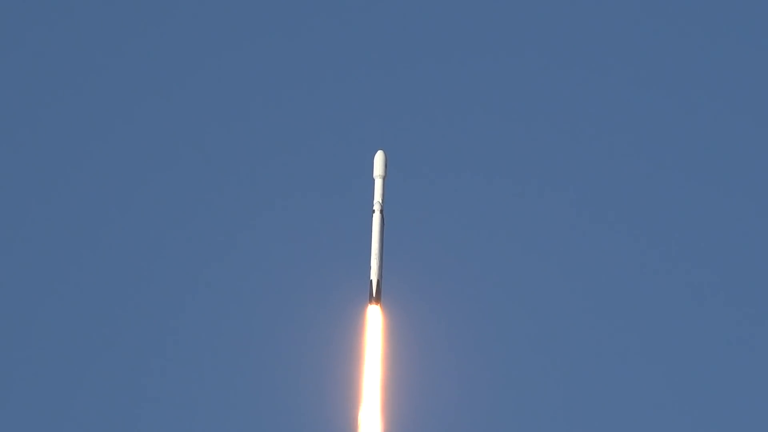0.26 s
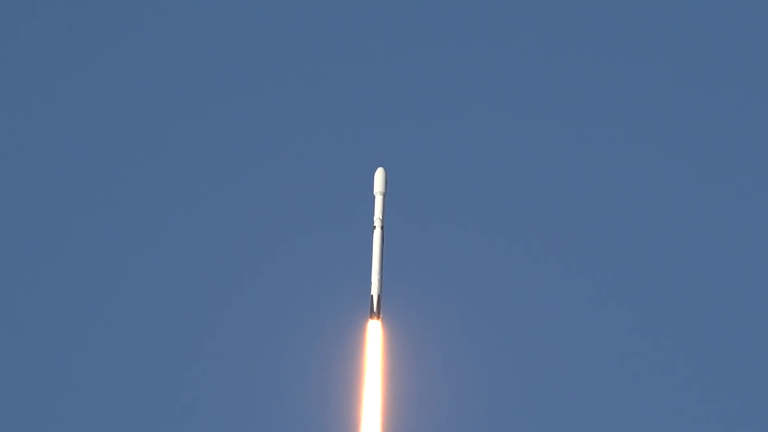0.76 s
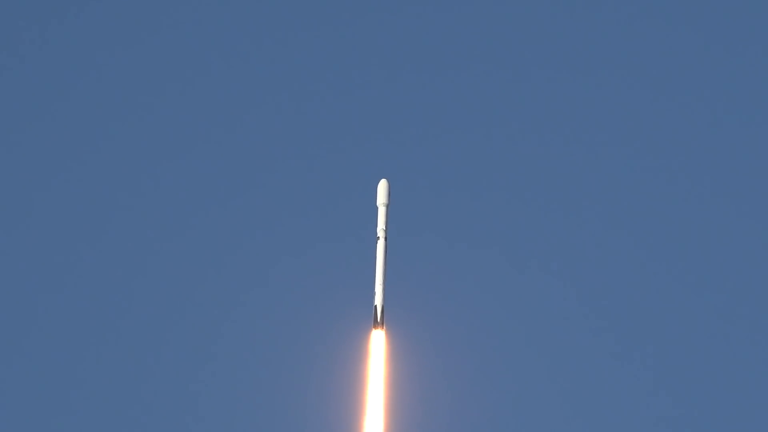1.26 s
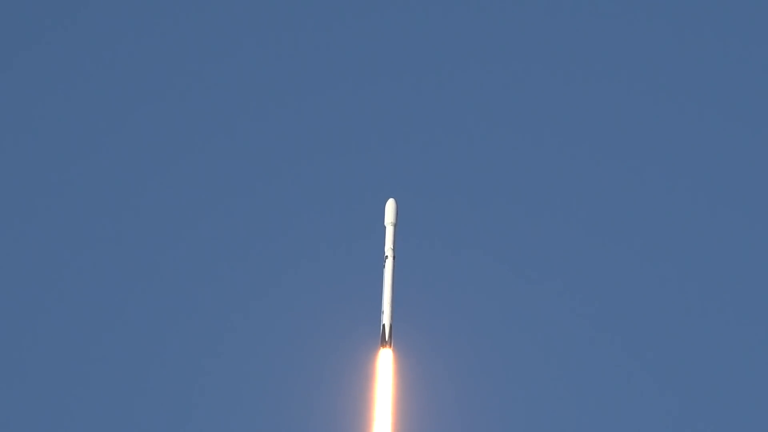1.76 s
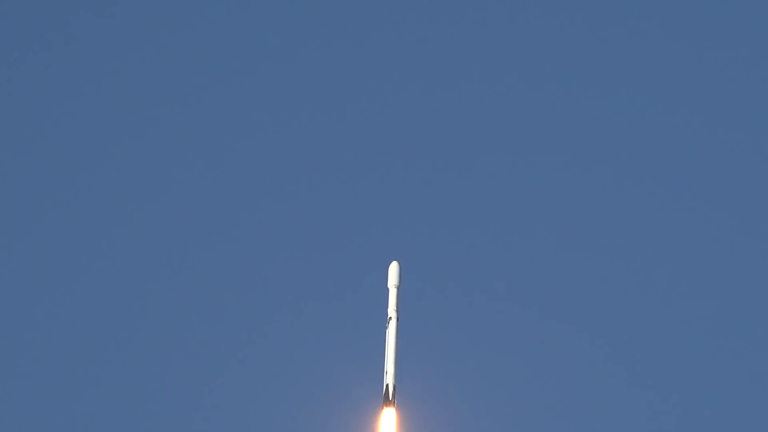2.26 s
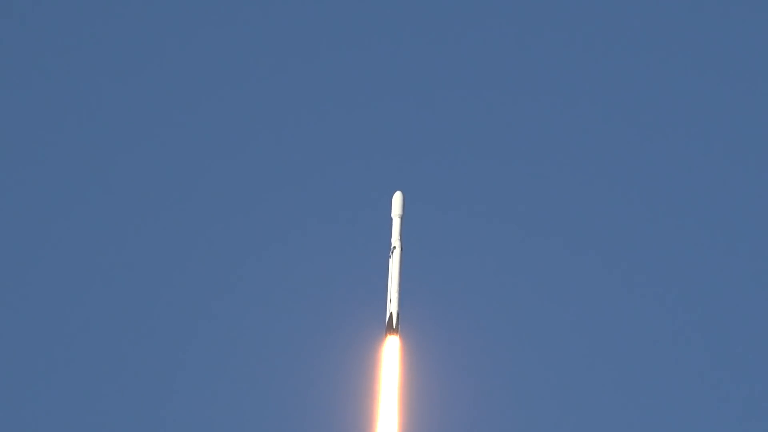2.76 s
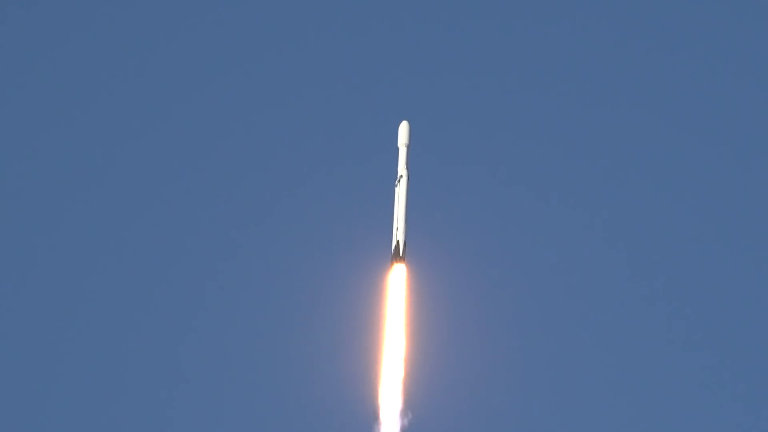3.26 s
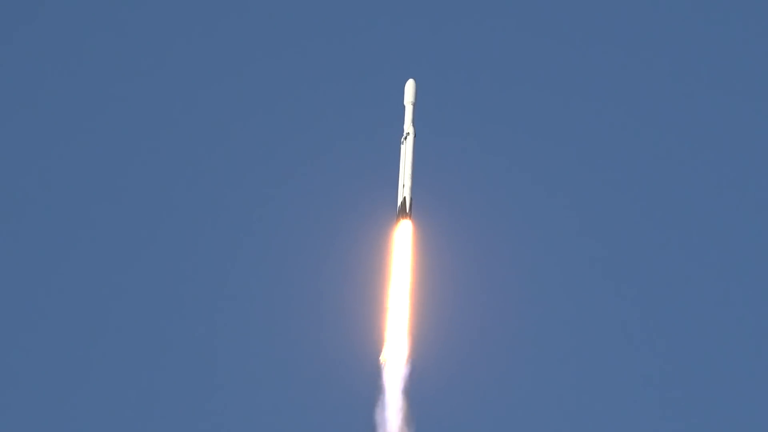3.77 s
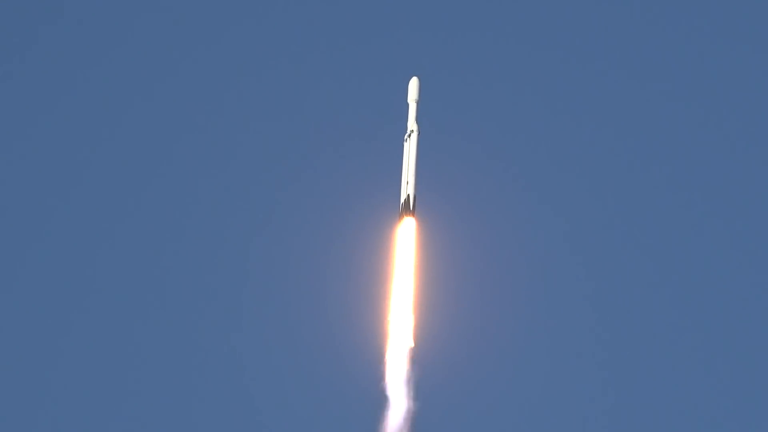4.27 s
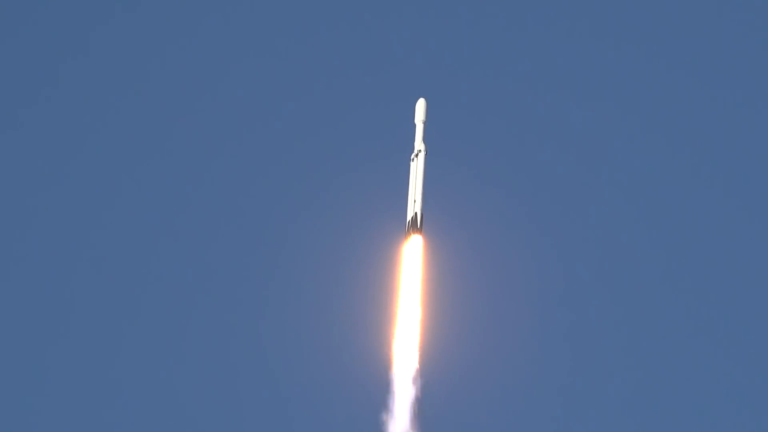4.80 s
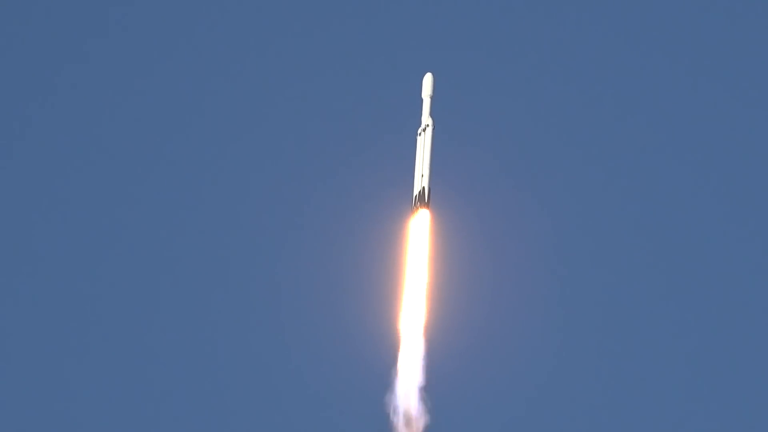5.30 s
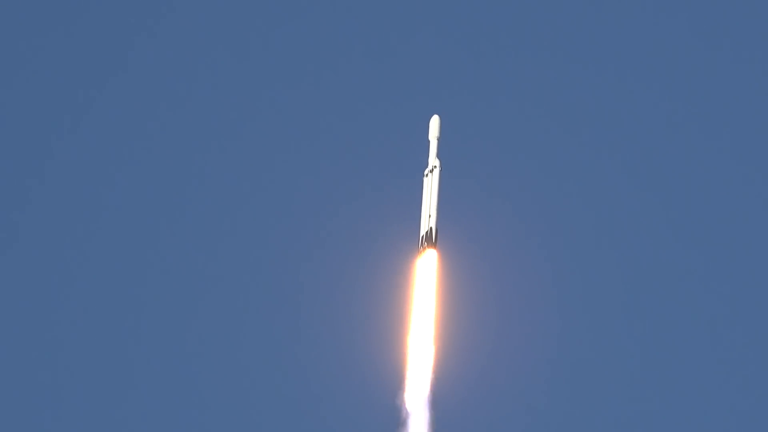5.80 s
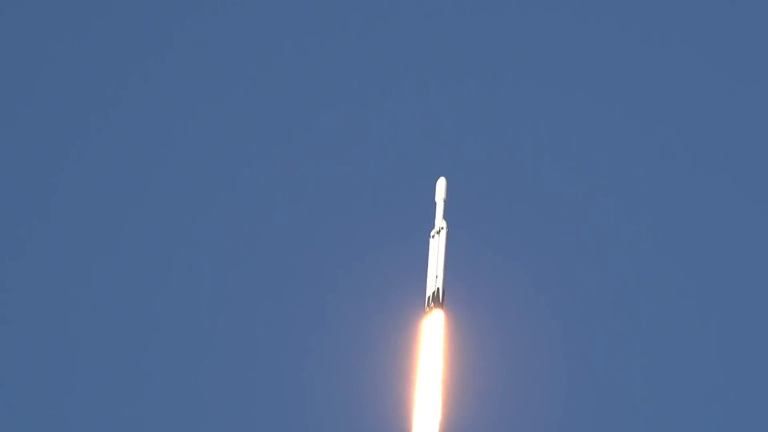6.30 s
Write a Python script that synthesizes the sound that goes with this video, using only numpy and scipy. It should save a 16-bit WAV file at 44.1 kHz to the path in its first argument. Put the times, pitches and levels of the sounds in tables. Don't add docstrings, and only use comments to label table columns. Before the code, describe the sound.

Open ground far below a climbing rocket, heard for about six and a half seconds. The roar is already present at 0 s: deep, dense, continuous and restless, with heavy bass thuds in the first third of a second. Until about 2.3 s the crackle stays dull and fairly weak, buried in the rumble; very faint dry ticks from the microphone mount fall near 0.5 s. From 2.4 s steeper pops appear, growing firm by 3.3 to 3.6 s. Around 3.9 s they turn bright and snapping. Strong cracks cluster near 4.75 s and the largest bursts at about 5.2 s, with a punchy low push. Dense ripping crackle continues to the end as the roar sinks slightly in pitch. Small ticks near 6.2 s are almost hidden. Short reflections from ground and nearby hard surfaces roughen and widen each crack; there is no fade-out.

```python
import sys
import numpy as np
from scipy import signal
from scipy.io import wavfile
from scipy.ndimage import uniform_filter1d, minimum_filter1d

SR = 44100
rng = np.random.default_rng(int(sys.argv[2]) if len(sys.argv) > 2 else 0)


def magnitude_from_level(level_db):
    exponent = np.asarray(level_db, float) / 20
    return 10 ** exponent


def store_pcm(level_fs):
    pcm = np.round(np.clip(level_fs, -1, 1) * 32767).astype(np.int16)
    wavfile.write(sys.argv[1], SR, np.atleast_2d(pcm).T)


N = 288716
TOP_HZ = 20000
BRIGHT_DB = -15

# start_s, loudness_db, harshness_db
EXHAUST = [(0.0, -15.5, -49.5), (0.14, -13, -68), (0.22, -17, -55), (0.25, -7.5, -61), (0.31, -12.5, -53),
           (0.67, -10.5, -56), (0.75, -15.5, -56), (1.04, -11, -57), (1.06, -16, -56), (1.31, -13, -56),
           (2.01, -13.5, -52), (3.96, -15, -52.5), (4.54, -15, -51.5), (5.38, -14, -50.5),
           (6.11, -14, -51.5), (6.2, -17.5, -52), (6.29, -11, -57), (6.55, -14.5, -52.5)]


def crackle():
    rise_at_bright_ms, rise_ms_per_db, weak_rise_ms_per_db = .036, .003, .0014
    push_lead_s = .001
    s, front_db, bright_db, push_db = fronts()
    push, swing = pushes(s - push_lead_s, push_db)
    rise_ms = rise_at_bright_ms - rise_ms_per_db * (bright_db - BRIGHT_DB)
    rise_ms = np.clip(rise_ms - weak_rise_ms_per_db * (front_db + 27), .008, .12)
    step_db = front_db + 6 + 90 * rise_ms
    edge = rounded(s, magnitude_from_level(step_db), rise_ms)
    return push, swing, sharp_part(edge + trail(s, step_db, rise_ms))


def trail(s, step_db, rise_ms):
    late_s = rng.random((len(s), 30)) ** 1.5 * .04
    turbulence_db = -9 - 0.1 * s
    fade_db_per_s = 320 + 115 * s
    size_db = (step_db + turbulence_db)[:, None] - fade_db_per_s[:, None] * late_s
    size = magnitude_from_level(size_db) * rng.standard_normal(late_s.shape)
    first_rise_ms = (.85 + .02 * s) * rise_ms
    ripple_rise_ms = first_rise_ms[:, None] * (1 + 29 * late_s)
    return rounded((s[:, None] + late_s).ravel(), size.ravel(), ripple_rise_ms.ravel())


def fronts():
    # start_s, peak_db, brightness_db, push_db
    steep_fronts = [(0.0649, -35.0, -23.0, -9.0), (0.1087, -31.0, -27.0, -2.0), (0.1458, -29.0, -21.0, -8.0),
                    (0.184, -44.0, -27.0, -16.0), (0.245, -26.0, -26.0, -1.0), (0.3264, -45.0, -30.0, -19.0),
                    (0.3415, -43.0, -32.0, -11.0), (0.4694, -42.0, -9.0, -15.0), (0.5701, -40.0, -16.0, -19.0),
                    (0.6365, -37.0, -23.0, -5.0), (0.7335, -45.0, -27.0, -25.0), (0.8363, -42.0, -21.0, -30.0),
                    (0.8558, -39.0, -27.0, -20.0), (0.9056, -44.0, -31.0, -13.0),
                    (0.9277, -42.0, -33.0, -30.0), (1.0316, -42.0, -24.0, -30.0), (1.1095, -40.0, -31.0, -7.0),
                    (1.2404, -45.0, -39.0, -15.0), (1.333, -40.0, -34.0, -20.0), (1.386, -38.0, -26.0, -8.0),
                    (1.4269, -43.0, -30.0, -30.0), (1.5054, -41.0, -33.0, -30.0),
                    (1.6371, -39.0, -30.0, -30.0), (1.6603, -39.0, -38.0, -6.0), (1.697, -45.0, -34.0, -9.0),
                    (1.7351, -45.0, -32.0, -13.0), (1.809, -43.0, -31.0, -12.0), (1.8358, -41.0, -33.0, -11.0),
                    (1.851, -45.0, -27.0, -17.0), (1.8668, -43.0, -38.0, -6.0), (1.8978, -41.0, -22.0, -12.0),
                    (1.9274, -41.0, -29.0, -24.0), (1.9576, -41.0, -32.0, -30.0),
                    (1.9823, -38.0, -30.0, -12.0), (2.0127, -39.0, -38.0, -11.0),
                    (2.0802, -43.0, -33.0, -17.0), (2.1408, -38.0, -25.0, -1.0), (2.1851, -39.0, -29.0, -28.0),
                    (2.203, -39.0, -27.0, -30.0), (2.2679, -40.0, -25.0, -30.0), (2.289, -42.0, -31.0, -15.0),
                    (2.3373, -34.0, -24.0, -7.0),
                    (2.3776, -43.0, -32.0, -18.0), (2.4006, -41.0, -32.0, -11.0),
                    (2.4105, -38.0, -32.0, -8.0), (2.4601, -40.0, -25.0, -8.0),
                    (2.5205, -38.0, -33.0, -13.0), (2.5513, -37.0, -27.0, -30.0),
                    (2.5914, -36.0, -19.0, -6.0), (2.6209, -37.0, -33.0, -11.0),
                    (2.6938, -37.0, -32.0, -18.0), (2.71, -38.0, -22.0, -19.0),
                    (2.732, -40.0, -27.0, -11.0), (2.785, -39.0, -33.0, -5.0), (2.8052, -31.0, -18.0, -5.0),
                    (2.8677, -35.0, -21.0, -15.0), (2.9028, -34.0, -24.0, -4.0),
                    (2.928, -35.0, -26.0, -30.0), (2.9546, -38.0, -25.0, -9.0),
                    (2.9753, -32.0, -30.0, -6.0), (3.1296, -33.0, -23.0, -12.0),
                    (3.1811, -38.0, -30.0, -10.0), (3.1947, -41.0, -33.0, -13.0),
                    (3.22, -31.0, -20.0, -5.0), (3.265, -37.0, -31.0, -11.0), (3.2995, -40.0, -33.0, -9.0),
                    (3.3161, -40.0, -30.0, -11.0), (3.3421, -25.0, -23.0, -4.0),
                    (3.3765, -30.0, -18.0, -9.0), (3.4119, -35.0, -14.0, -8.0),
                    (3.4396, -30.0, -21.0, -8.0), (3.4749, -30.0, -19.0, -6.0),
                    (3.5195, -29.0, -17.0, -6.0), (3.5576, -39.0, -27.0, -7.0),
                    (3.5746, -24.0, -19.0, -6.0), (3.6187, -37.0, -29.0, -7.0),
                    (3.6287, -35.0, -31.0, -10.0), (3.6904, -40.0, -18.0, -22.0),
                    (3.7092, -38.0, -25.0, -5.0), (3.7251, -36.0, -27.0, -8.0),
                    (3.7613, -35.0, -34.0, -10.0), (3.7803, -41.0, -21.0, -15.0),
                    (3.8101, -28.0, -29.0, -4.0), (3.8455, -41.0, -20.0, -15.0),
                    (3.8685, -23.0, -10.0, -5.0), (3.8915, -24.0, -13.0, -5.0), (3.9141, -38.0, -27.0, -11.0),
               (3.9677, -33.0, -23.0, -9.0), (3.9883, -39.0, -17.0, -12.0), (4.0057, -36.0, -29.0, -11.0),
               (4.049, -38.0, -23.0, -20.0), (4.0675, -36.0, -20.0, -7.0), (4.1056, -42.0, -21.0, -12.0),
               (4.1212, -33.0, -21.0, -14.0), (4.1484, -32.0, -16.0, -7.0), (4.1782, -42.0, -16.0, -12.0),
               (4.2135, -28.0, -14.0, -5.0), (4.2347, -42.0, -24.0, -21.0), (4.26, -36.0, -20.0, -9.0),
               (4.2955, -35.0, -16.0, -5.0), (4.3198, -32.0, -15.0, -9.0), (4.3598, -42.0, -26.0, -30.0),
               (4.4085, -28.0, -14.0, -2.0), (4.4406, -42.0, -23.0, -10.0), (4.5109, -28.0, -11.0, -4.0),
               (4.5571, -34.0, -23.0, -10.0), (4.603, -31.0, -13.0, -4.0), (4.6204, -32.0, -28.0, -6.0),
               (4.6954, -37.0, -23.0, -30.0), (4.7298, -35.0, -15.0, -4.0), (4.7528, -20.0, -13.0, 0.0),
               (4.7788, -21.0, -17.0, -1.0), (4.799, -32.0, -27.0, -8.0), (4.8107, -30.0, -19.0, -4.0),
               (4.8505, -36.0, -22.0, -2.0), (4.8902, -29.0, -23.0, -5.0), (4.9209, -31.0, -15.0, -3.0),
               (4.9557, -37.0, -19.0, -11.0), (4.9716, -35.0, -28.0, -4.0), (4.9873, -33.0, -27.0, -3.0),
               (5.0087, -42.0, -26.0, -12.0), (5.0312, -41.0, -25.0, -7.0), (5.063, -38.0, -24.0, -30.0),
               (5.0992, -22.0, -18.0, -2.0), (5.1536, -40.0, -15.0, -5.0), (5.1689, -13.0, -13.0, 2.0),
                    (5.2, -29.0, -19.0, -1.0), (5.2288, -26.0, -23.0, -6.0), (5.2618, -32.0, -22.0, -6.0),
                  (5.2821, -37.0, -25.0, -8.0), (5.331, -39.0, -24.0, -9.0), (5.3507, -25.0, -17.0, -2.0),
                  (5.3841, -25.0, -15.0, -2.0), (5.4106, -32.0, -13.0, -8.0), (5.439, -33.0, -25.0, -6.0),
                  (5.4564, -24.0, -20.0, -4.0), (5.4838, -25.0, -19.0, -4.0), (5.5161, -41.0, -21.0, -30.0),
                  (5.5493, -21.0, -18.0, -1.0), (5.567, -31.0, -21.0, -1.0), (5.6171, -35.0, -28.0, -9.0),
                  (5.6379, -34.0, -12.0, -6.0), (5.6904, -36.0, -22.0, -9.0), (5.7249, -32.0, -17.0, -8.0),
                  (5.801, -32.0, -22.0, -6.0), (5.845, -35.0, -23.0, -5.0), (5.8705, -39.0, -25.0, -30.0),
                  (5.9107, -32.0, -12.0, -2.0), (5.9391, -41.0, -24.0, -9.0), (5.9693, -36.0, -18.0, -1.0),
                  (5.9926, -35.0, -21.0, -4.0), (6.0224, -33.0, -8.0, -2.0), (6.0566, -42.0, -24.0, -20.0),
                  (6.1008, -35.0, -14.0, -3.0), (6.1314, -36.0, -19.0, -9.0), (6.149, -37.0, -17.0, -5.0),
                  (6.2248, -39.0, -21.0, -5.0), (6.2397, -36, -10, -10), (6.2701, -34.0, -11.0, -5.0),
                  (6.3144, -33.0, -11.0, -6.0), (6.355, -31.0, -10.0, -1.0), (6.3939, -41.0, -18.0, -7.0),
                  (6.4359, -35.0, -16.0, -7.0), (6.4667, -38.0, -22.0, -9.0), (6.5075, -36.0, -24.0, -5.0)]
    weak_count, weak_over_harsh_db, weak_spread_db = 20, 6, 3.5
    late_s, front_gain_db = .0001, -2.5
    push_gain_db, push_spread, mean_push_db = -0.4, 1.15, 0.1
    chance = rng.random((weak_count, 3))
    at = (chance[:, 0] * (N - SR // 10)).astype(int)
    harsh_db = in_time(EXHAUST)[1][at]
    weak_db = harsh_db + weak_over_harsh_db - weak_spread_db * np.log(1 - .9 * chance[:, 1])
    weak = np.transpose([at / SR, weak_db, BRIGHT_DB - 6 - 6 * chance[:, 2], weak_db + 25])
    s, peak_db, bright_db, push_db = np.vstack([steep_fronts, weak]).T
    bright_db = np.minimum(bright_db, -25.5 + 4.2 * s)
    push_db = push_gain_db + push_spread * (push_db - mean_push_db)
    return s + late_s, peak_db + front_gain_db, bright_db, push_db


def pushes(s, push_db):
    spike_ms, swing_db, swing_cycles = 1.1, -6.5, 1.2
    lead_samples = 27
    k = np.arange(SR // 12)
    ms = k * 1000 / SR
    cycle_ms = (12 + 2.8 * s)[:, None]
    at = (s * SR).astype(int)[:, None] + k
    size = magnitude_from_level(np.minimum(push_db, 0))[:, None]
    spike, swing = np.zeros((2, N + SR // 5))
    np.add.at(spike, at, size * np.exp(-ms / spike_ms))
    wave = np.cos(2 * np.pi * ms / cycle_ms) * np.exp(-ms / cycle_ms / swing_cycles)
    np.add.at(swing, at, size * magnitude_from_level(swing_db) * wave)
    round_part = dull(spike[lead_samples:N + lead_samples], 350, order=3)
    snap = magnitude_from_level(climbed(-24, -2.5)) * (dull(spike[:N], 720, order=3) - round_part)
    return round_part + snap, dull(swing[:N], 260, order=3)


def roar():
    lumps_db, lumps_per_s = 2, 9
    mean_harsh_db = -53
    t = np.arange(N) / SR
    loud_db, harsh_db = in_time(EXHAUST)
    harsh_db = harsh_db - mean_harsh_db
    deep_db = loud_db - 4.5 + 0.65 * t + lumps_db * drift(lumps_per_s)
    low_db = loud_db + 1.5 - 1.75 * t + lumps_db * drift(lumps_per_s)
    middle_db = loud_db - 10.3 + 0.33 * t + 0.97 * harsh_db + lumps_db * drift(lumps_per_s)
    rattle_db = -43.5 + 0.69 * harsh_db
    clumps = magnitude_from_level(3.0 * drift(14))
    born = rng.random(N) < 400 * clumps / SR
    strength = np.minimum(rng.exponential(1, N), 4)
    small_fronts = rms_one(born * magnitude_from_level(3.3 * strength))
    noise = rng.standard_normal((2, N))
    mixed = jump(small_fronts + 0.6 * noise[0], swing_hz=36.3, decay_ms=4.9)
    deep = rms_one(band(0.46 * small_fronts + noise[1], 26, 69.6))
    low = rms_one(band(mixed, 79, 162.5))
    middle = rms_one(band(mixed, 130, 407))
    ripple = rng.random(N) < 3000 * clumps / SR
    at = np.flatnonzero(born | ripple)
    size = np.where(born[at], magnitude_from_level(2.2 * strength[at]), 0.55 * noise[1, at])
    rise_ms = (0.142 - .0115 * t[at]) * magnitude_from_level(-1.2 * strength[at])
    rattle = rms_one(sharp_part(rounded(at / SR, size, rise_ms)))
    body = magnitude_from_level(deep_db - 1.2) * deep + magnitude_from_level(low_db - 3) * low + magnitude_from_level(middle_db - 3) * middle
    return body, magnitude_from_level(rattle_db - 8.5) * rattle


def rounded(times, sizes, rise_ms):
    k = np.arange(-40, 41)
    width = np.clip(rise_ms, .008, .25)[:, None] * SR / 1000
    slope = 1 / np.cosh(k / width) ** 2
    out = np.zeros(N + SR // 10)
    at = (times * SR).astype(int)[:, None] + k
    np.add.at(out, at, sizes[:, None] * slope / slope.sum(axis=1, keepdims=True))
    return out[:N]


def jump(x, swing_hz, decay_ms):
    r = np.exp(-1000 / (decay_ms * SR))
    c = np.cos(2 * np.pi * swing_hz / SR)
    return signal.lfilter([1, -r * c], [1, -2 * r * c, r * r], x + 1e-18)


def sharp_part(slope):
    return band(jump(slope, swing_hz=40, decay_ms=1.8), 540, 9800, order=1)


def climbed(low_db, high_db):
    full_at_s, full_over_s = 4.6, 0.35
    return low_db + (high_db - low_db) / (1 + np.exp((full_at_s - np.arange(N) / SR) / full_over_s))


def ground(x, gain_db, cut_hz):
    lag_ms = 1.2 + .6 * np.arange(N) / SR
    return magnitude_from_level(climbed(-3, 1.5) + gain_db) * dull(delayed(x, lag_ms), cut_hz, order=1)


def wall(x):
    lag_ms = 20 - 1.3 * np.arange(N) / SR
    return magnitude_from_level(climbed(-5, -16)) * band(delayed(x, lag_ms), 70, 400, order=1)


def nearby(x, taps):
    waver = 1 + 0.018 * drift(5)
    bright = x + 0.41 * band(x, 4500, TOP_HZ, order=1)
    return x + sum(gain * delayed(bright, ms * waver) for ms, gain in taps)


def small_panel(x):
    gain_db = -5 + np.array([[3], [-3]])
    return magnitude_from_level(gain_db) * delayed(band(x, 2400, 13000), 6.95)


def landscape(x, t60, onset_ms, alike):
    t = np.arange(SR // 4) / SR
    tail = rng.standard_normal((2, 2, len(t))) * magnitude_from_level(-60 * t / t60) * (1 - np.exp(-t * 1000 / onset_ms))
    tail /= np.sqrt(np.sum(tail ** 2, axis=2, keepdims=True))
    alike = np.clip(alike, 0, 1)
    tail[:, 1] = alike * tail[:, 0] + np.sqrt(1 - alike ** 2) * tail[:, 1]
    turn = 2.35 * drift(12)
    shares = np.cos(turn), np.sin(turn)
    return sum(signal.oaconvolve((x * share)[None], path, axes=1)[:, :N] for share, path in zip(shares, tail))


def near_ticks():
    # start_s, peak_db
    ticks = [
        (0.4723, -48),
        (0.4776, -60),
        (0.5742, -52.5),
        (0.577, -64),
        (6.192, -58),
        (6.204, -60),
    ]
    s, peak_db = np.transpose(ticks)
    return band(clicks(s, magnitude_from_level(peak_db + 14.5)), 5500, 10500)


def band(x, low_hz, high_hz, order=2):
    sos = signal.butter(order, [low_hz, min(high_hz, TOP_HZ)], "band", fs=SR, output="sos")
    return signal.sosfilt(sos, x + 1e-18)


def dull(x, cut_hz, order=2):
    return signal.sosfilt(signal.butter(order, cut_hz, fs=SR, output="sos"), x + 1e-18)


def peak(x, hz, width_hz, gain_db):
    w, a = 2 * np.pi * hz / SR, magnitude_from_level(gain_db / 2)
    q = np.sin(w) * width_hz / hz / 2
    return signal.lfilter([1 + q * a, -2 * np.cos(w), 1 - q * a], [1 + q / a, -2 * np.cos(w), 1 - q / a], x)


def delayed(x, lag_ms):
    return np.interp(np.arange(N) - lag_ms * SR / 1000, np.arange(N), x)


def later(x):
    return np.append(x[0], x[:-1])


def rms_one(x):
    return x / np.sqrt(np.mean(x ** 2) + 1e-20)


def in_time(rows):
    s, *columns = np.transpose(rows)
    return [np.interp(np.arange(N) / SR, s, c) for c in columns]


def drift(rate):
    knots = rng.standard_normal(int(N / SR * 40) + 2)
    return np.interp(np.arange(N) / SR * min(rate, 39), np.arange(len(knots)), knots)


def clicks(times, sizes):
    out = np.zeros(N)
    out[(np.asarray(times) * SR).astype(int)] = sizes
    return out


def limiter(x, hold_ms):
    size = int(hold_ms * SR / 1000)
    room = np.minimum(1, 1 / (np.abs(x).max(axis=0) + 1e-9))
    return x * uniform_filter1d(minimum_filter1d(room, size=2 * size + 1), size=size)


def scene():
    # lag_ms, gain (linear)
    near_left = [(.42, 0.0061), (1.15, -0.066), (2.85, -0.25), (3.25, 0.25), (3.56, 0.12), (5.8, -0.078),
                 (6.8, 0.3), (7.18, -0.18), (7.6, 0.003)]
    near_right = [(.43, 0.07), (1.2, -0.19), (2.7, 0.061), (4.1, 0.1), (4.4, -0.25), (5.8, 0.19),
                  (6.92, 0.38), (7.14, 0.23), (7.56, 0.29)]
    body, rattle = roar()
    push, swing, edge = crackle()
    soft = body + push + swing + ground(push, gain_db=-4, cut_hz=500) + wall(push + swing)
    soft = dull(soft, 2500, order=3)
    sharp = rattle + edge
    sharp = sharp + magnitude_from_level(climbed(-13, 2.5)) * band(sharp, 260, 950, order=1)
    sharp = sharp + ground(sharp, gain_db=4.5, cut_hz=150)
    near = np.array([nearby(sharp, near_left), nearby(later(sharp), near_right)])
    near = near + small_panel(sharp)
    clutter = magnitude_from_level(-2.5) * landscape(band(sharp, 2600, 9500), t60=0.047, onset_ms=0.97, alike=.1)
    rumble_back = magnitude_from_level(-11.5) * landscape(band(soft, 30, 120), t60=0.23, onset_ms=1.5, alike=.1)
    rattle_back = magnitude_from_level(-10) * landscape(dull(sharp, 4000), t60=.3, onset_ms=6, alike=.92)
    return np.array([soft, later(soft)]) + near + clutter + rumble_back + rattle_back + near_ticks()


def roll_off(x):
    return signal.sosfilt(signal.butter(12, 16900, fs=SR, output="sos"), x)


def record(dry):
    # center_hz, width_hz, left_db, right_db
    housing = [(190, 149, 4.5, 3.5), (343, 170, 1.5, 3), (539, 58.4, -12.5, -12.5), (588, 280, 5.5, 0.5),
               (707, 21, -16.5, -3), (980, 40, 2, -5.5), (1870, 2000, 4, 2.5), (4400, 1500, 3, -4),
               (10600, 8000, 6, 1)]
    floor_db = -94.5
    for hz, width_hz, left_db, right_db in housing:
        dry = np.array([peak(dry[0], hz, width_hz, left_db), peak(dry[1], hz, width_hz, right_db)])
    dry = limiter(band(dry, 3.7, 23000, order=1), hold_ms=14)
    dry = dry + magnitude_from_level(floor_db) * dull(rng.standard_normal(dry.shape), 12800, order=6)
    return roll_off(dry)


dry = scene()
out = record(dry)
store_pcm(out)
```